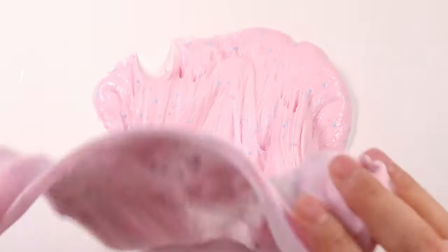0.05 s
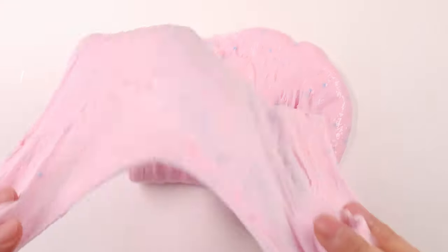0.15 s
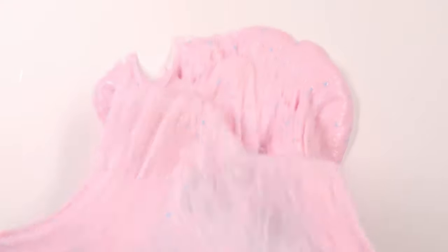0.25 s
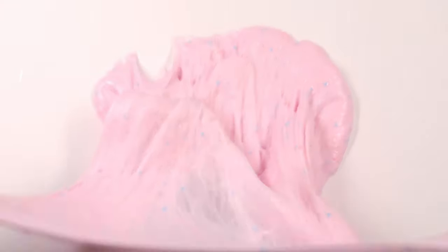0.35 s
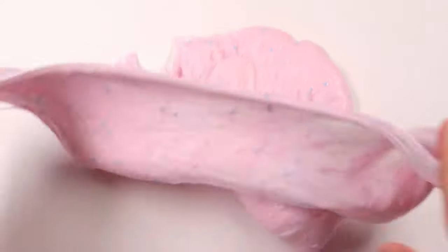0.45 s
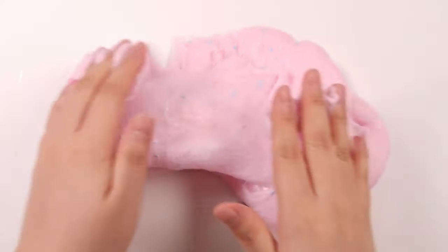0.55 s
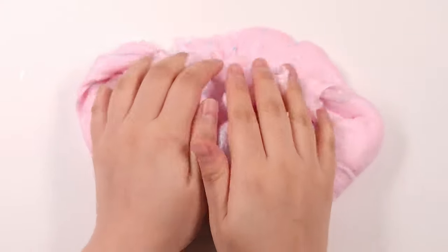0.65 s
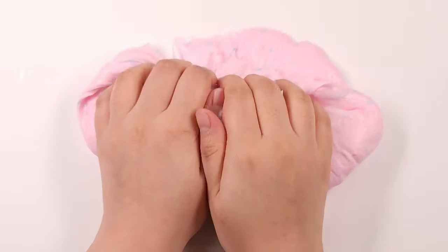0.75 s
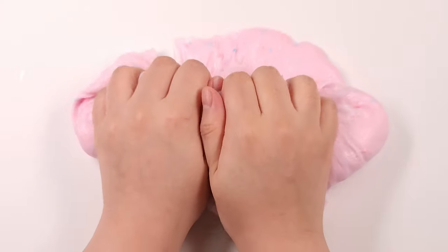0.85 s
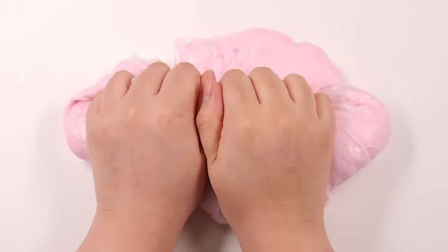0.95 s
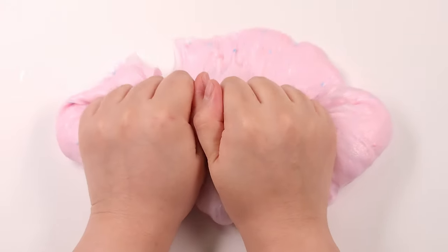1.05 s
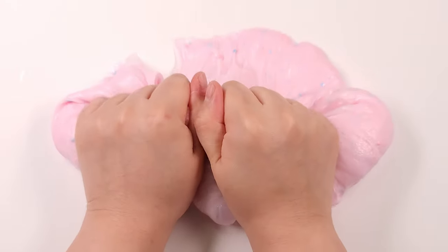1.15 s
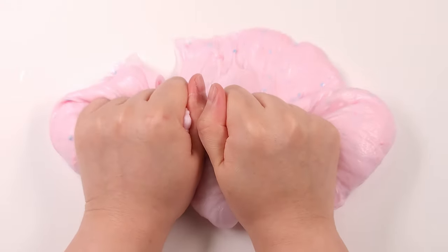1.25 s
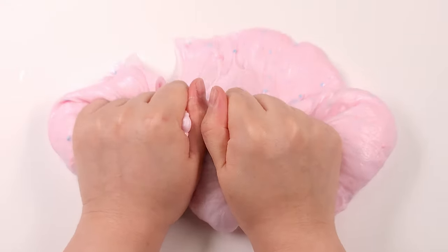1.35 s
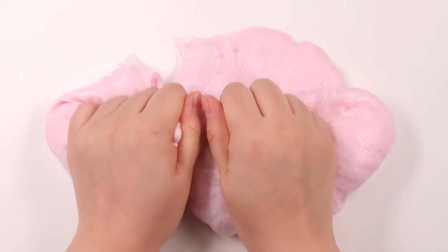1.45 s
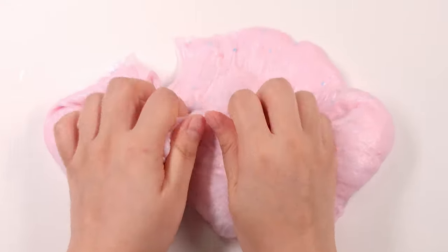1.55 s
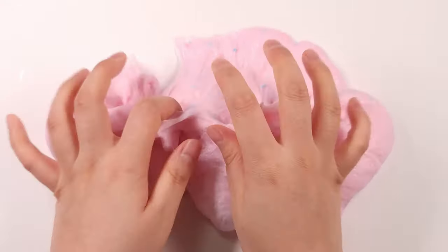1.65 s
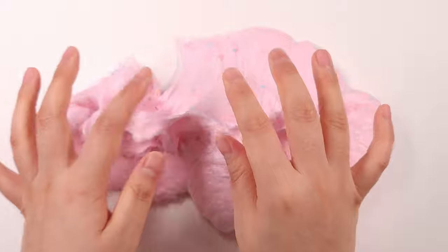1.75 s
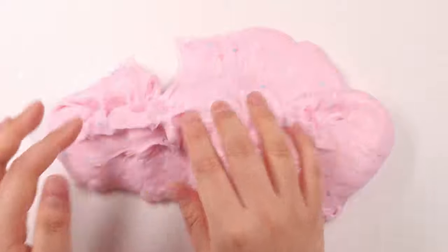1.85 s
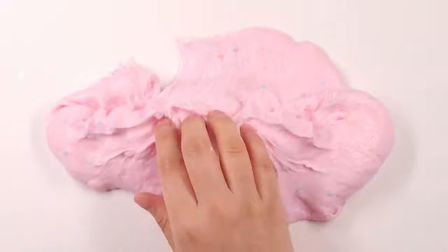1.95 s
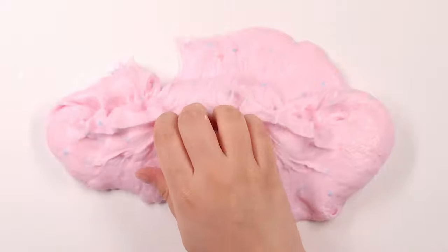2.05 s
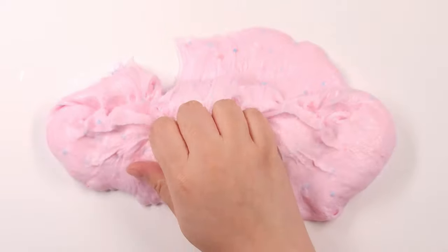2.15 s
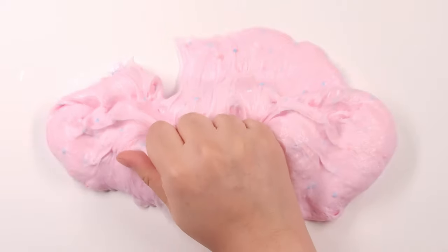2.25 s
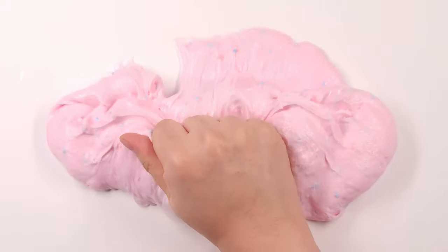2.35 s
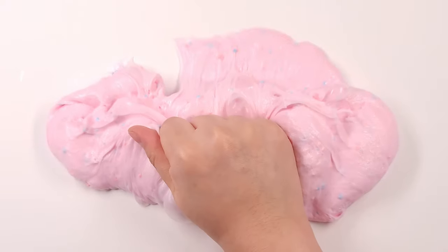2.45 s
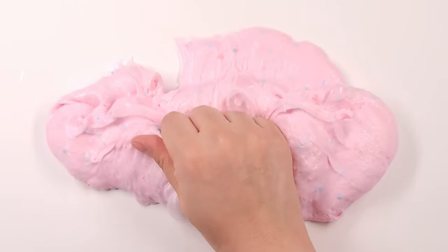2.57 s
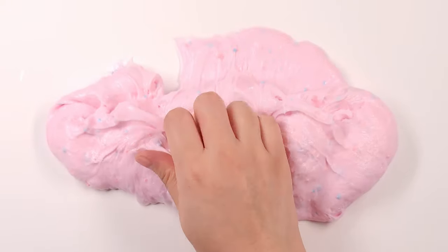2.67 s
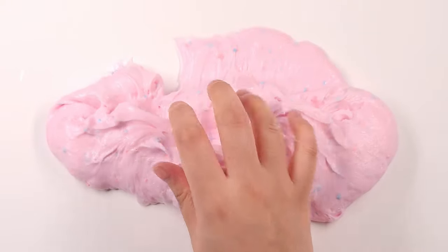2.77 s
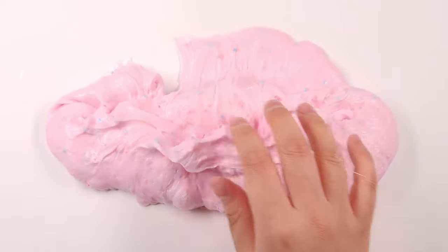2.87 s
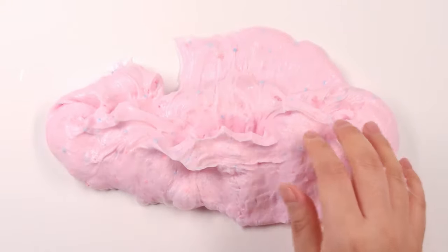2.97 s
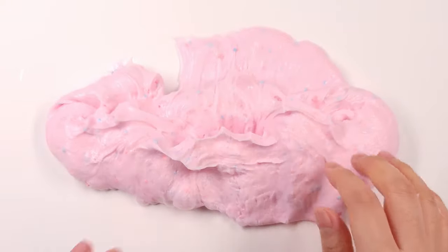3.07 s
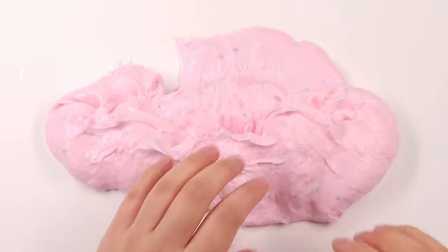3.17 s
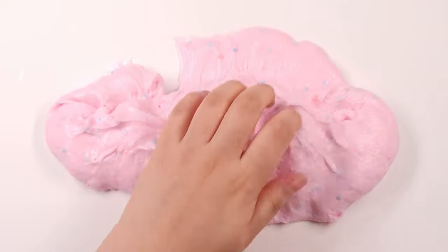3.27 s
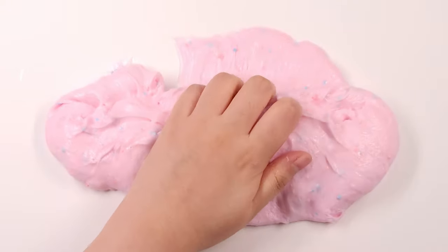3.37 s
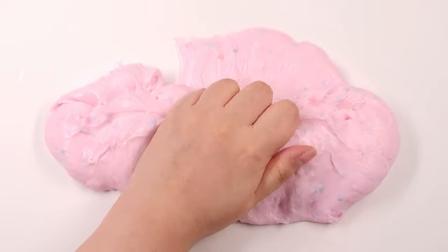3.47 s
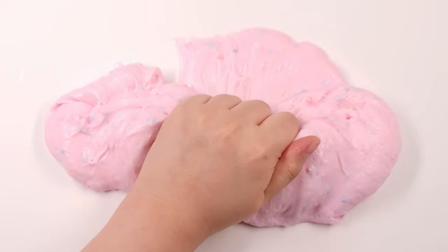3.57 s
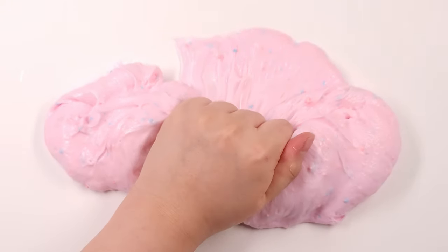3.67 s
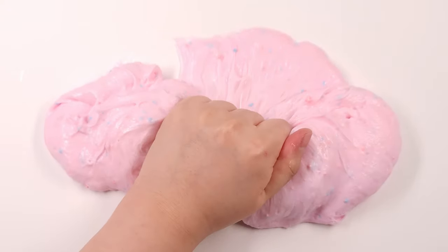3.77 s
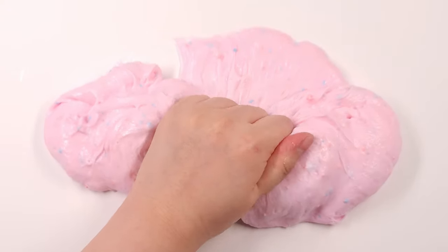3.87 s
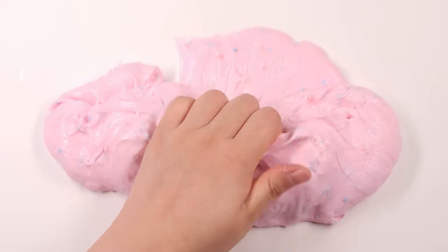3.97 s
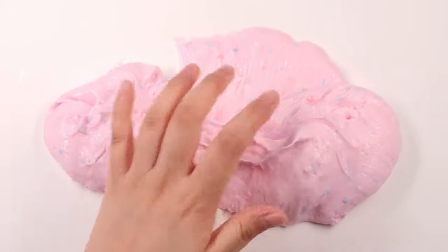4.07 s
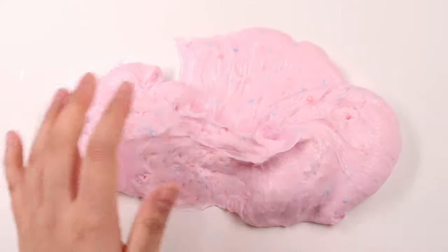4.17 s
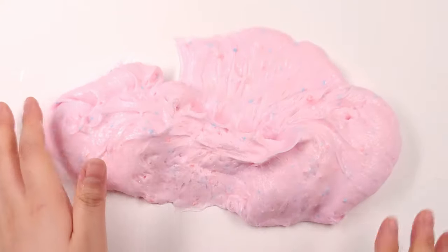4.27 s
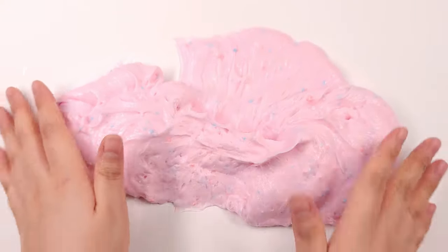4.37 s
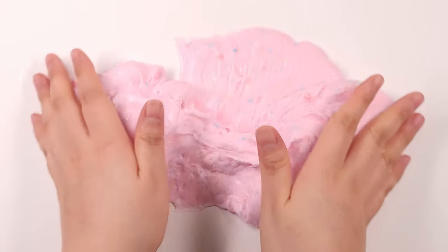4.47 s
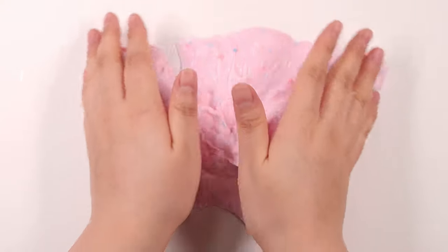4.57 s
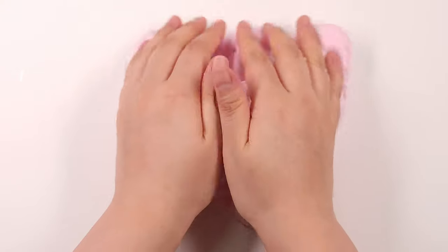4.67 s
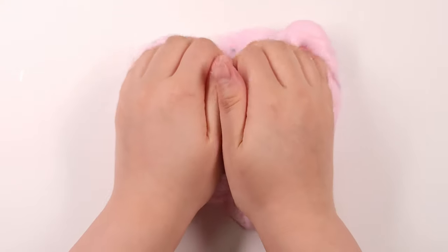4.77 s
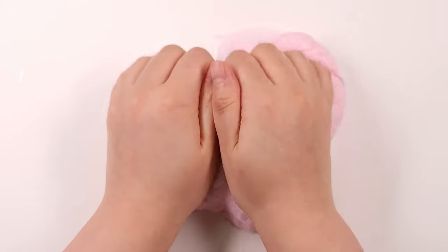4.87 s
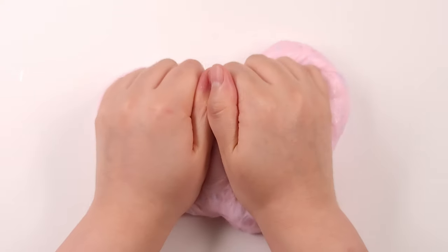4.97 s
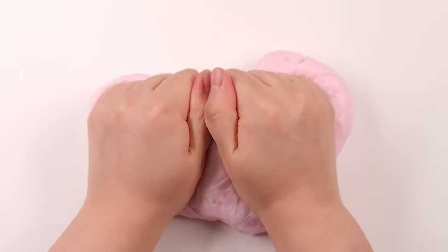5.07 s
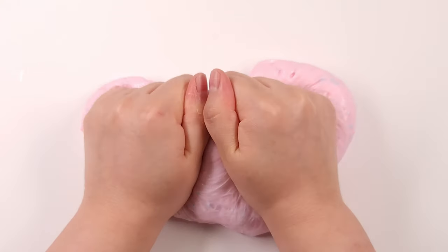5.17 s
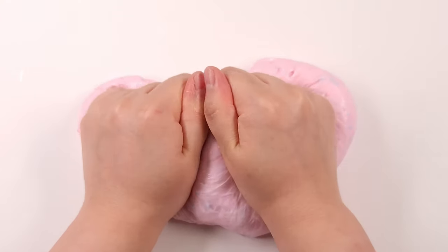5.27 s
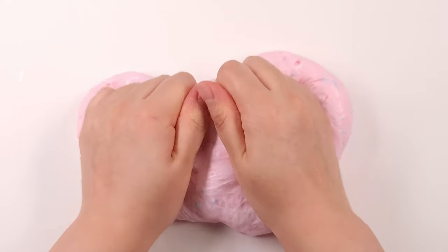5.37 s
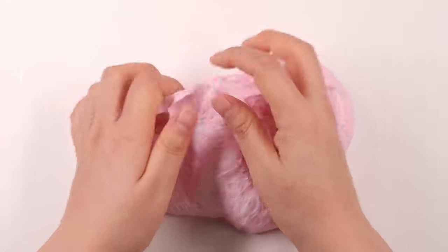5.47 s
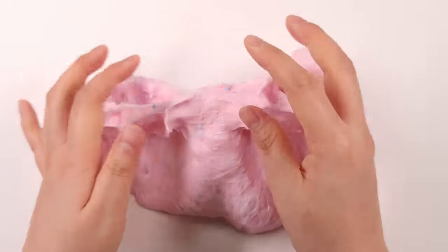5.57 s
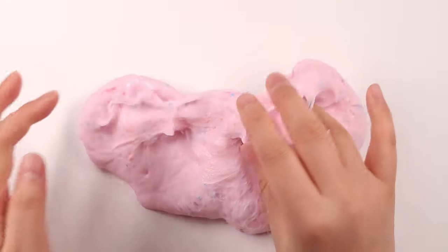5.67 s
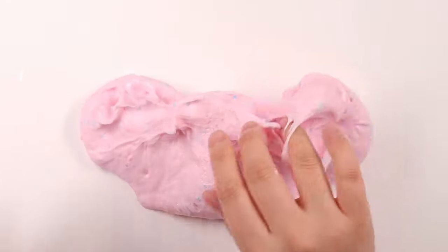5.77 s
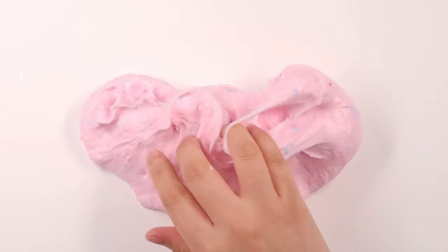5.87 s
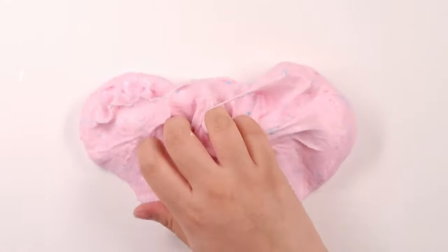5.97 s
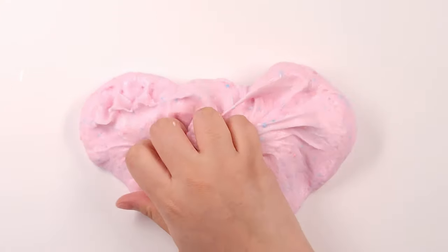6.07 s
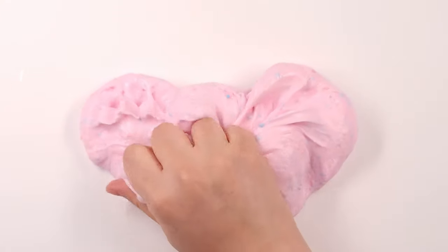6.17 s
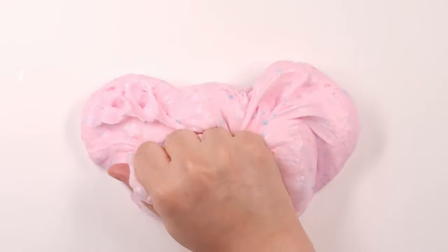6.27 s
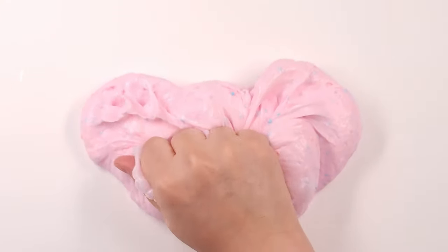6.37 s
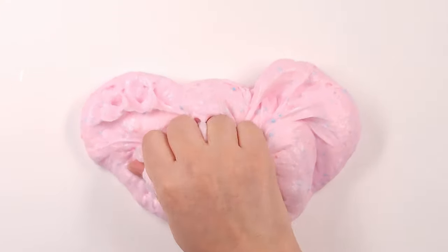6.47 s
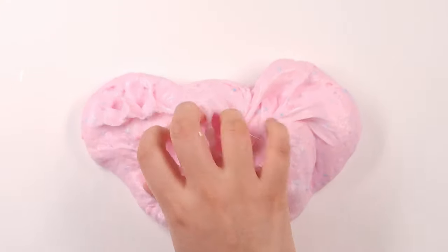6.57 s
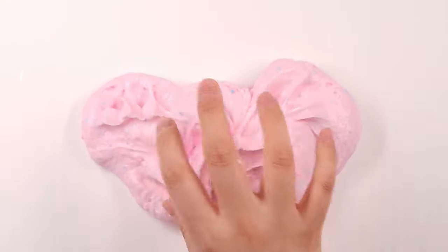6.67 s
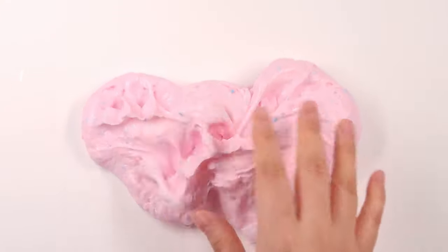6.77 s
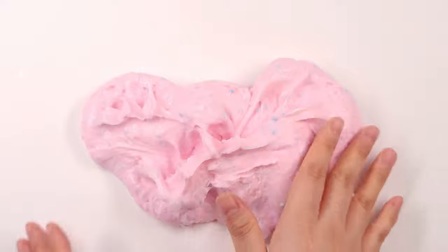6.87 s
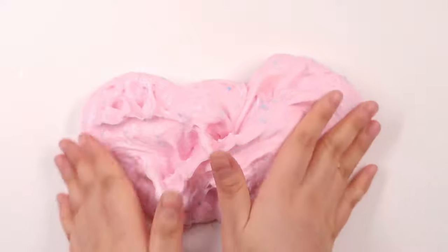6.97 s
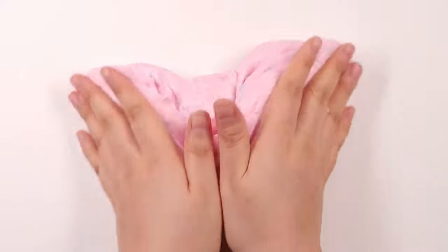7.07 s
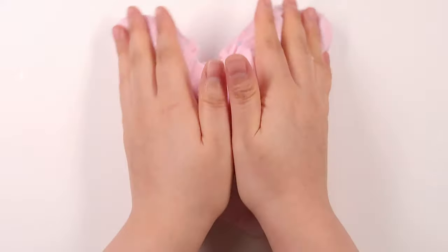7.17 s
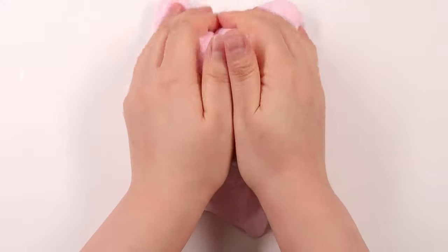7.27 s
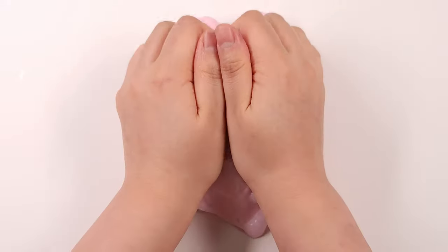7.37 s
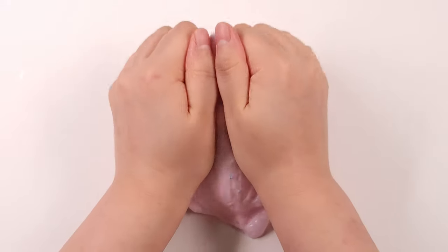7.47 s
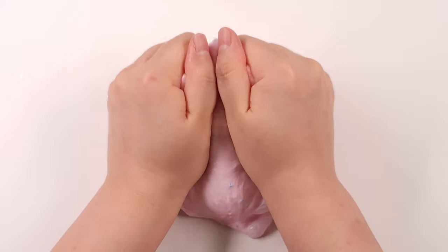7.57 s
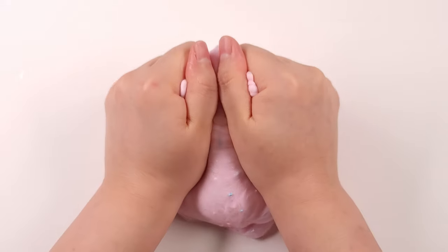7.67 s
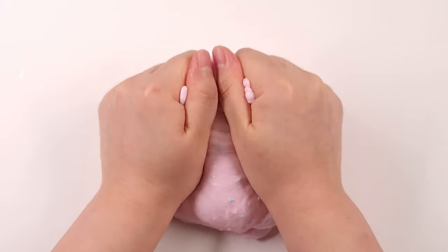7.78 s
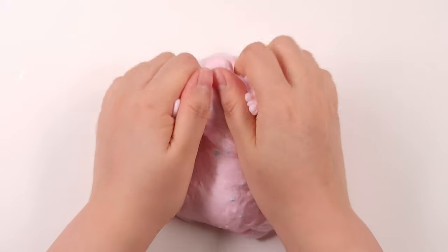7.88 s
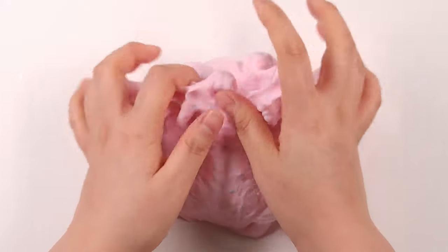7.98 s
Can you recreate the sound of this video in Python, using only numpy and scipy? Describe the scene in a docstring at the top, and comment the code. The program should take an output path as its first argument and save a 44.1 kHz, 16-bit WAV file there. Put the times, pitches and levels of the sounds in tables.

```python
"""Kneading slime on a table

Hands fold and knead a thick lump of slime on a table, close to the microphone in a small quiet room.
Presses burst air pockets (short cavity rings, then sputtering noise) and snap taut films (dry bursts).
Underneath lie a wet crackle of tiny bubbles and a dull squash (random clicks in bands), and soft thumps.
Between presses the fingers peel off with a finer, softer crackle. Low ringing, a short room tail
and steady room tone surround the lump; the loudest pops overload the microphone."""
import sys
import numpy as np
from scipy import signal
from scipy.fft import rfft, irfft
from scipy.io import wavfile
from scipy.ndimage import uniform_filter1d

SR = 44100
rng = np.random.default_rng(int(sys.argv[2]) if len(sys.argv) > 2 else 0)


def output_pcm(signal):
    """Save a mono or channel-first signal as 16-bit PCM at the path in sys.argv[1].

    Samples are clipped to [-1, 1] before scaling.
    """
    pcm = np.clip(np.atleast_2d(signal).T, -1, 1) * 32767
    wavfile.write(sys.argv[1], SR, np.round(pcm).astype(np.int16))


N = 353946  # samples, about 8 s

# Air pockets that burst and then sputter empty.
# Each row: start in seconds, pop level in dB, cavity pitch in Hz, sputter level in dB.
AIR_POCKETS = [(0.843, 2, 680, -33), (0.8696, 6.5, 1054, -17.5), (0.909, 4.5, 2600, -26),
               (0.9518, 11, 1307, -16.5), (0.978, 2, 5900, -19.5), (1.0144, 5.5, 3670, -21),
               (1.033, 13.5, 4770, -21), (1.072, 8, 2050, -18.5), (1.0879, 2, 6500, -24),
               (1.1161, -4.5, 726, -36.5), (1.1538, 14, 6350, -14), (1.1889, 12, 10700, -10.5),
               (1.2136, 12.5, 3700, -24.5), (1.244, 5.5, 8300, -24.5), (1.266, 9, 6000, -16),
               (1.2942, 6.5, 2150, -18.5), (1.3704, 3, 4340, -27), (1.4, 4, 11000, -22.5),
               (1.6697, -5, 686, -27), (2.2839, 4, 2060, -14.5), (2.3737, 9.5, 3260, -20),
               (2.4116, -4, 980, -31), (2.4554, 5, 6100, -19.5), (2.4555, -12, 790, -20),
               (2.495, 1, 4760, -26.5), (3.588, 8, 2140, -21), (3.6227, 3.5, 2140, -20),
               (3.6448, 3, 6460, -18), (3.6572, 2, 2020, -15.5), (3.6963, 7, 2600, -15),
               (3.7899, 2, 1930, -25), (4.076, -10.5, 1760, -35.5), (4.6666, 0, 3870, -29.5),
               (4.9651, 1, 1760, -18), (5.0106, 3.5, 2080, -26.5), (5.028, 2.5, 1880, -24.5),
               (5.049, -13.5, 605, -33.5), (5.0662, 8, 6740, -20.5), (5.1635, 2, 8000, -19),
               (5.1816, 4, 8400, -20), (5.2084, 9.5, 8400, -24), (5.2981, -0.5, 2190, -25.5),
               (5.3419, 7, 9100, -24.5), (5.5602, -0.5, 780, -28), (6.304, 5.5, 7800, -24.5),
               (6.362, 10, 10200, -23.5), (7.2893, 3, 3770, -30), (7.374, 2, 3530, -25.5),
               (7.5185, 10, 7700, -21), (7.576, 2, 4800, -31), (7.625, -6.5, 830, -33),
               (7.744, 15.5, 10200, -21.5)]
# Pressure builds and the slime seals up just before a big pocket bursts.
SEAL_S, SEAL_DB, BIG_POP_DB = 0.0049, -13.5, 0.5

# Taut films that snap dry, with no air left behind them.
# Each row: start in seconds, level in dB, pitch in Hz.
TAUT_FILMS = [(0.3618, -17, 1280), (0.6214, -20, 1570), (0.6751, 1, 8700), (0.778, -24, 2080),
              (0.902, 4.5, 5640), (0.9325, -4, 12000), (1.0002, 12.5, 7900), (1.0477, 0, 3184),
              (1.0543, 5, 7950), (1.067, 2, 9000), (1.0973, 5, 9000), (1.104, 10, 7000), (1.123, 7, 5530),
              (1.143, 6, 6000), (1.2276, 5, 7000), (1.285, 13, 11100), (1.3217, 5, 7500),
              (1.3421, 8.5, 7860), (1.355, 9, 8900), (1.394, 1, 10500), (1.5259, -11, 11800),
              (1.5452, 0, 8550), (1.6992, -0.5, 2942), (2.2154, -9.5, 3670), (2.2337, -19, 2950),
              (2.264, -1.5, 2900), (2.316, 4.5, 4560), (2.3465, 1, 4200), (2.413, 9.5, 5800),
              (2.637, -14, 12300), (3.4932, -24.5, 1900), (3.5163, -7.5, 3200), (3.5468, 10, 9600),
              (3.5994, 6, 5500), (3.7155, 3, 6500), (3.7556, 11.5, 9500), (3.8207, 3, 11100),
              (3.877, -0.5, 10000), (3.9624, -29, 5000), (4.644, -15.5, 10800), (4.8742, -20.5, 3460),
              (4.917, -11.5, 2060), (5.0201, 6, 8800), (5.103, 2.5, 12000), (5.1341, -0.5, 5040),
              (5.1413, 0, 6700), (5.1881, -2.5, 2200), (5.2438, 3.5, 10100), (5.276, 0.5, 5300),
              (5.306, 12.5, 7650), (5.322, -7.5, 1790), (5.7535, -18, 3820), (6.188, -15.5, 3080),
              (6.2794, -3, 4930), (6.331, -1.5, 3430), (6.353, 2.5, 5170), (6.4184, -3.5, 3450),
              (6.4423, 0, 5100), (6.514, -12, 3220), (6.5553, -15, 3600), (7.1448, -28, 1840),
              (7.152, 2.5, 8800), (7.3146, 0, 7900), (7.3506, 1, 3230), (7.385, 3.5, 2650),
              (7.4209, 3.5, 2900), (7.467, -1, 4700), (7.4793, -6.5, 1040), (7.4834, 6, 5500),
              (7.4897, 7, 5560), (7.5031, 3.5, 4000), (7.546, 5, 2700), (7.5796, 3, 4050),
              (7.6115, 2, 9500), (7.6325, 1.5, 4780), (7.656, -18, 4640), (7.6826, 2.5, 5500),
              (7.7254, 14, 11500), (7.7325, 3, 3500), (7.762, 10, 10300), (7.8724, -12, 1850)]

# Every stroke of the hands swells, is held while the slime gives way, and is released.
# It sounds in three sizes of bubble, always listed as: dull squash, wet squelch, fine fizz.

# The fists bear down. Each row: time of full force in seconds, swell in seconds, hold in seconds,
# level in dB before the mix, brightness in dB.
PRESSES = [(0.96, 0.3, 0.47, -32, -3), (2.29, 0.13, 0.22, -35, -2), (3.7, 0.27, 0.038, -25, -0.5),
           (4.97, 0.24, 0.34, -39, 0.5), (6.33, 0.41, 0.09, -42.5, 4.5), (7.55, 0.4, 0.25, -34, 4)]
# Mix of a press. Columns: squash, squelch and fizz in dB.
PRESS_MIX_DB = (-2, -2, -3)
# The big bubbles go first, so a press turns from dull to fizzy.
# Columns: sag of squash, squelch and fizz in dB per second.
PRESS_SAG_DB_PER_S = (58.5, 28, 1.5)

# The lump is stretched, gathered and folded. Each row: time of full grip in seconds, swell in seconds,
# hold in seconds, level in dB before the mix, brightness in dB.
FOLDS = [(0.0, 0.12, 0.23, -59, 9.5), (0.15, 0.14, 0.015, -51, -1), (0.39, 0.31, 0.027, -51, 0),
         (0.665, 0.016, 0.0015, -29, -1.5), (0.76, 0.12, 0.19, -45.5, 1), (2.09, 0.19, 0.19, -64.5, 5.5),
         (4.71, 0.21, 0.045, -37, 3), (4.83, 0.81, 0.15, -51, 7.5), (5.88, 0.306, 0.33, -67, 8.5),
         (7.05, 0.2, 0.092, -65.5, 7.5), (7.21, 0.21, 0.091, -36.5, 5), (7.28, 0.44, 0.13, -34.5, -1)]
# Mix of a fold. Columns: squash, squelch and fizz in dB.
FOLD_MIX_DB = (-5.5, -3.5, -5)
# How a held fold weakens. Columns: sag of squash, squelch and fizz in dB per second.
FOLD_SAG_DB_PER_S = (16.5, 7, 11.5)

# The fingers pull free. Each row: time of full pull in seconds, swell in seconds, hold in seconds,
# level in dB before the mix, brightness in dB.
PEELS = [(1.63, 0.088, 0.089, -35, 3), (1.69, 0.21, 0.16, -30, 2), (2.778, 0.084, 0.135, -30, 1),
         (4.08, 0.085, 0.0098, -35, 0), (4.15, 0.27, 0.001, -32.5, 3), (5.562, 0.11, 0.2, -27, 0.5),
         (6.61, 0.076, 0.084, -32.5, 4), (6.675, 0.24, 0.18, -30.5, 2), (8.02, 0.099, 0.02, -31, 4.5)]
# Mix of a peel. Columns: squash, squelch and fizz in dB.
PEEL_MIX_DB = (-6, -4, -6.5)
# How a held peel weakens. Columns: sag of squash, squelch and fizz in dB per second.
PEEL_SAG_DB_PER_S = (127.5, 116, 119)
# The sag stops here: threads cling and keep crackling. Columns: squash, squelch and fizz in dB.
PEEL_CLING_DB = (28, 22.5, 11)
# The last threads part quickly. Columns: fall of squash, squelch and fizz in dB per second.
PEEL_RELEASE_DB_PER_S = (237, 531, 582)

SWELL_DB = 48.5  # gained over the swell time
# Release of presses and folds. Columns: fall of squash, squelch and fizz in dB per second.
RELEASE_DB_PER_S = (235, 304.5, 372.5)
# The lump settling by itself. Columns: squash, squelch and fizz in dB.
SETTLING_DB = (-92.5, -96.5, -80.5)

# The lump lands on the table, or tugs at it. Each row: start in seconds, level in dB, pitch in Hz.
TABLE_THUMPS = [(0.356, -39, 84.8), (0.872, -22.5, 131.4), (0.953, -14, 322), (1.713, -37, 86.5),
                (2.281, -21, 270), (2.765, -24.5, 224), (3.657, -21.5, 160), (4.077, -29, 169),
                (4.467, -49, 130), (4.574, -43.5, 96.4), (4.964, -24, 129.5), (5.04, -25.5, 192.4),
                (6.655, -21.5, 199), (6.839, -43.5, 92.7), (7.077, -51, 109), (7.138, -37.5, 99),
                (7.545, -21.5, 267)]
# What the kneading sets ringing in table and room.
# Each row: pitch in Hz, gain at the peak in dB, decay by 60 dB in seconds.
LOW_MODES = [(39, 4.5, 1.1), (76.4, -3.5, 0.21), (143, -6, 0.26), (287.5, 4, 0.14), (366, -4, 0.27)]
# Spectrum of the room tone, only its shape. Each row: frequency in Hz, density in dB per Hz.
ROOM_TONE_SHAPE = [(25, -6.5), (78, 1), (200, -24.5), (5500, -13.5), (7600, -27), (9500, -16.5)]
ROOM_TONE_DB = -65.5  # rms level ahead of the microphone
# Microphone colour. Each row: frequency in Hz, gain in dB.
MIC_COLOUR = [(30, -3.5), (100, 3.5), (380, -2), (700, 0.5), (1100, -2.5), (2000, -0.06), (7500, -2.5),
              (9200, -5.5), (11500, 2), (15500, -5)]
CUTOFF_HZ = 16000


def pops(sputter_s=0.021, sputter_width=1.95, sputter_per_s=1700, grain_db=4.5, gush=1.0, gush_s=0.012):
    """After each burst the air gushes, then sputters out through the sticky gap."""
    out = np.zeros(N)
    t = np.arange(SR // 10) / SR
    for start_s, pop_db, hz, sputter_db in AIR_POCKETS:
        add(out, start_s, from_db(pop_db) * burst(hz))
        air = band(grains(sputter_per_s, grain_db, len(t)), hz / sputter_width, hz * sputter_width)
        # big, low pockets take longer to empty; sputter_s holds at 3000 Hz
        emptying_s = sputter_s * (3000 / hz) ** .4
        flow = np.exp(-.5 * (t / emptying_s) ** 2)
        first_rush = 1 + gush * np.exp(-t / gush_s)
        sputter = rms_one(air * flow * first_rush) * np.sqrt(np.mean(flow ** 2))
        add(out, start_s, from_db(sputter_db) * sputter)
    return out


def snaps():
    """Each taut film gives one dry click."""
    out = np.zeros(N)
    for start_s, level_db, hz in TAUT_FILMS:
        add(out, start_s, from_db(level_db) * burst(hz))
    return out


def burst(hz, cycles=1.31, snap_db=-14.5, snap_s=0.00024, scatter_db=-1.0, scatter_s=0.0019,
          scatter_db_per_octave=-3, bass_cut_share=0.16):
    """A film tears with a snap and the opened cavity rings briefly, radiating little below its pitch."""
    t = np.arange(SR // 50) / SR
    # the ring loses 20 dB in the given number of cycles
    cavity = np.sin(2 * np.pi * hz * t) * from_db(-20 * t * hz / cycles)
    snap_noise, scatter_noise = rng.standard_normal((2, len(t)))
    sound = cavity + from_db(snap_db) * snap_noise * np.exp(-t / snap_s)
    bass_cut = signal.butter(1, min(bass_cut_share * hz, CUTOFF_HZ), "high", fs=SR)
    sound = signal.lfilter(*bass_cut, sound)
    # folds scatter the deep pockets, while small ones at the surface stay sharp
    scatter = scatter_noise * (np.exp(-t / scatter_s) - np.exp(-10 * t / scatter_s))
    scattered = signal.fftconvolve(sound, scatter / np.linalg.norm(scatter))[:len(t)]
    octaves = max(np.log2(hz / 2500), 0)
    return sound + from_db(scatter_db + scatter_db_per_octave * octaves) * scattered


def ticks(work_db, tick_db=18.5, spread_db=0.5, count=1200):
    """Small pockets of all sizes burst at random, more often the harder the slime is worked."""
    out = np.zeros(N)
    for when, chance, pitch in rng.random((count, 3)):
        level_db = work_db[int(when * N)]
        if chance < np.clip((level_db + 38) / 10, .1, 1):
            gain_db = level_db + tick_db + 6 * pitch + spread_db * rng.standard_normal()
            add(out, when * N / SR, from_db(gain_db) * burst(1500 * 7 ** pitch))
    return out


def crackle(squash, squelch, fizz, per_s, grain_db, clump_db, patchy_db=4.0, shove_db=-25, shove_share=0.68):
    """Countless tiny bubbles and threads break in clumps; handling shoves the table in the bass."""
    clicks = grains(per_s, grain_db, N) * from_db(clump_db * drift(260))
    # even out the power over 1/60 s
    clicks /= np.sqrt(np.abs(uniform_filter1d(clicks ** 2, SR // 60)) + 1e-9)
    # each band takes its level from the neighbouring sizes of bubble
    anchors = np.log([65, 290, 1500, 9000])
    shove = shove_db + shove_share * squash
    levels = np.array([shove, squash, squelch, fizz])
    out = np.zeros(N)
    for hz in np.geomspace(45, 13000, 13):
        shares = np.array([np.interp(np.log(hz), anchors, row) for row in np.eye(4)])
        fresh_signs = rng.choice([-1, 1], N)
        bubbles = rms_one(band(clicks * fresh_signs, hz / 1.28, hz * 1.28))
        patches = rms_one(from_db(patchy_db * drift(50)))
        out += bubbles * from_db(shares @ levels) * patches
    return out


def sealing():
    """Gain of the gripping crackle: it stalls for a moment before each big pocket gives way."""
    stall = np.zeros(N)
    for start_s, pop_db, _, _ in AIR_POCKETS:
        if pop_db > BIG_POP_DB:
            add(stall, start_s - SEAL_S, np.sqrt(np.linspace(0, 1, round(SEAL_S * SR))))
    return from_db(SEAL_DB * stall)


def strokes(rows, mix_db, sag_db_per_s, release_db_per_s=RELEASE_DB_PER_S, deepest_sag_db=np.inf):
    """Power of squash, squelch and fizz for one kind of stroke; brightness trades squash for fizz."""
    power = np.zeros((3, N))
    now = np.arange(N) / SR
    for full_s, swell_s, hold_s, level_db, bright_db in rows:
        near = np.abs(now - full_s) < 1
        t = now[near] - full_s
        swell = SWELL_DB * np.minimum(t, 0) / swell_s
        sag = np.minimum(np.outer(np.clip(t, 0, hold_s), sag_db_per_s), deepest_sag_db).T
        release = np.outer(release_db_per_s, np.maximum(t - hold_s, 0))
        top = level_db + np.array(mix_db) + bright_db * np.array([-1, 0, 1])
        power[:, near] += from_db(top[:, None] + swell - sag - release) ** 2
    return power


def kneading(power):
    """Levels in dB of squash, squelch and fizz; the lump never stops settling."""
    return 10 * np.log10(power + from_db(SETTLING_DB)[:, None] ** 2)


def thumps(attack_s=0.001, decay_s=0.024, width=1.67):
    """A soft weight lands with a short, dull bump of band-passed noise."""
    out = np.zeros(N)
    t = np.arange(SR // 4) / SR
    push = (1 - np.exp(-t / attack_s)) * np.exp(-t / decay_s)
    push_rms = np.sqrt(np.mean(push ** 2))
    for start_s, level_db, hz in TABLE_THUMPS:
        bump = band(rng.standard_normal(len(t)) * push, hz / width, hz * width)
        add(out, start_s, from_db(level_db) * rms_one(bump) * push_rms / push.max())
    return out


def low_ring(x):
    """Table and room hum on briefly at their low modes, each a two-pole resonator."""
    out = np.zeros(N)
    for hz, peak_db, t60 in LOW_MODES:
        r = from_db(-60 / (t60 * SR))
        feed = [(1 - r * r) / 2, 0, (r * r - 1) / 2]
        poles = [1, -2 * r * np.cos(2 * np.pi * hz / SR), r * r]
        out += from_db(peak_db) * signal.lfilter(feed, poles, x)
    return out


def room(x, tail_db=-14, low_t60=0.27, high_t60=0.16):
    """The walls add a short tail whose treble dies first."""
    t = np.arange(SR // 2) / SR
    low, high = rng.standard_normal((2, len(t)))
    low_tail = band(low, 100, 2500) * from_db(-60 * t / low_t60)
    high_tail = band(high, 2500, CUTOFF_HZ) * from_db(-60 * t / high_t60)
    tail = (low_tail + high_tail) * (t > .005)  # walls answer after 5 ms
    return from_db(tail_db) * signal.fftconvolve(x, tail / np.linalg.norm(tail))[:N]


def room_tone():
    """Steady noise shaped to the spectrum of the quiet room."""
    return from_db(ROOM_TONE_DB) * rms_one(coloured(rng.standard_normal(N), ROOM_TONE_SHAPE))


def from_db(db):
    """Decibels to gain."""
    return 10 ** (np.asarray(db) / 20)


def rms_one(x):
    """Scale to rms 1."""
    return x / np.sqrt(np.mean(x ** 2) + 1e-20)


def at_hz(points, hz):
    """Read a spectrum in dB on a log-frequency axis."""
    f, db = np.transpose(points)
    return np.interp(np.log(np.maximum(hz, 1)), np.log(f), db)


def band(x, low, high):
    """Causal band-pass."""
    edges = [min(low, .4 * SR), min(high, .45 * SR)]
    return signal.sosfilt(signal.butter(2, edges, "band", fs=SR, output="sos"), x + 1e-18)


def coloured(x, points):
    """Minimum-phase filter with the given spectrum: nothing sounds early."""
    size = 8192
    gain = from_db(at_hz(points, np.fft.rfftfreq(size, 1 / SR)))
    # folding the cepstrum onto positive times gives minimum phase
    cepstrum = irfft(np.log(gain))
    cepstrum[1:size // 2] *= 2
    cepstrum[size // 2 + 1:] = 0
    return signal.fftconvolve(x, irfft(np.exp(rfft(cepstrum))))[:len(x)]


def drift(rate):
    """Slow random wander with rms 1, taking a new value `rate` times a second."""
    knots = rng.standard_normal(N // 20)
    return rms_one(np.interp(np.arange(N) / SR * rate, np.arange(len(knots)), knots))


def grains(per_s, spread_db, size):
    """Random clicks of either sign, many small and a few large."""
    heights = from_db(spread_db * np.minimum(rng.exponential(1, size), 4))
    return (rng.random(size) < per_s / SR) * heights * rng.choice([-1, 1], size)


def add(out, start_s, sound):
    """Mix a sound in at a time."""
    start = round(start_s * SR)
    out[start:start + len(sound)] += sound[:N - start]


def scene():
    """Slime, its room and the room tone: gripping crackles coarsely, peeling finely and evenly."""
    press_power = strokes(PRESSES, PRESS_MIX_DB, PRESS_SAG_DB_PER_S)
    fold_power = strokes(FOLDS, FOLD_MIX_DB, FOLD_SAG_DB_PER_S)
    squash, squelch, fizz = kneading(press_power + fold_power)
    gripping = sealing() * crackle(squash, squelch, fizz, per_s=4000, grain_db=4.0, clump_db=4.0)
    peel_power = strokes(PEELS, PEEL_MIX_DB, PEEL_SAG_DB_PER_S, PEEL_RELEASE_DB_PER_S, PEEL_CLING_DB)
    peeling = crackle(*kneading(peel_power), per_s=6000, grain_db=2.5, clump_db=2.5)
    slime = pops() + snaps() + ticks(np.maximum(squelch, fizz)) + gripping + peeling + thumps()
    return (slime + low_ring(slime) + room(slime) + room_tone())[None]


def record(dry):
    """The microphone colours the sound, the loudest pops clip, the top is cut."""
    clipped = np.clip(coloured(dry[0], MIC_COLOUR), -.88, .88)
    top_cut = signal.ellip(10, .1, 70, CUTOFF_HZ, fs=SR, output="sos")
    return signal.sosfilt(top_cut, clipped)[None]


dry = scene()
out = record(dry)
output_pcm(out)
```